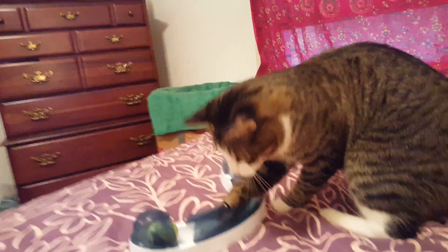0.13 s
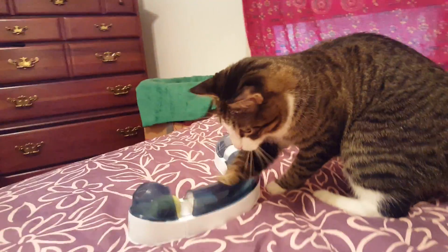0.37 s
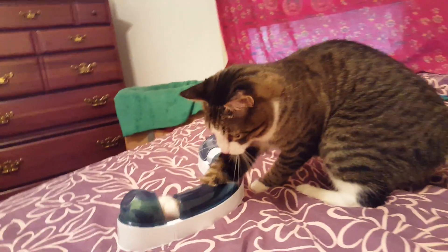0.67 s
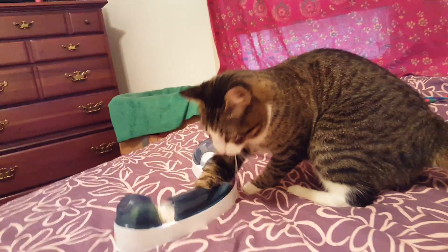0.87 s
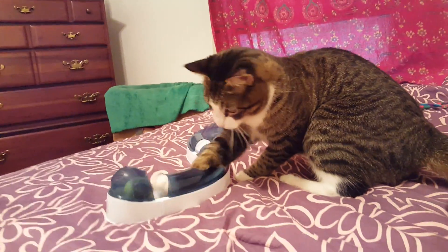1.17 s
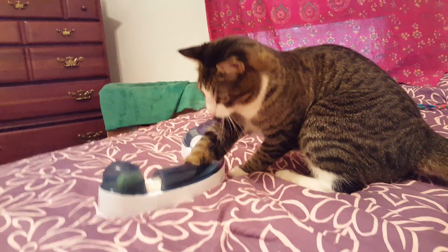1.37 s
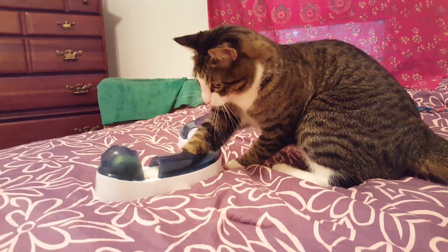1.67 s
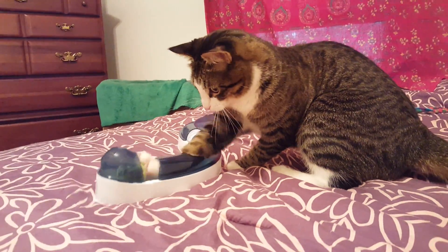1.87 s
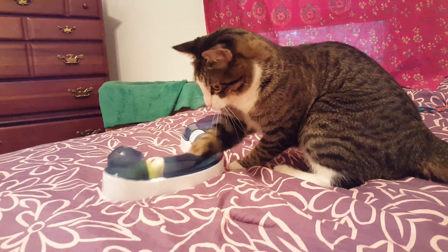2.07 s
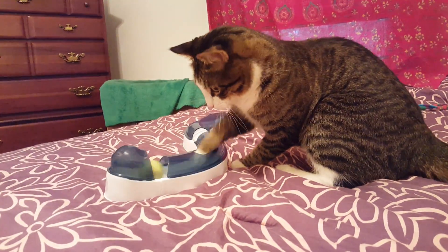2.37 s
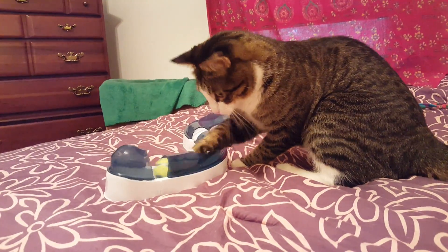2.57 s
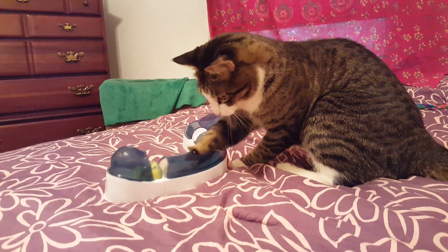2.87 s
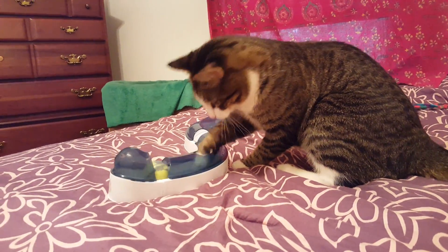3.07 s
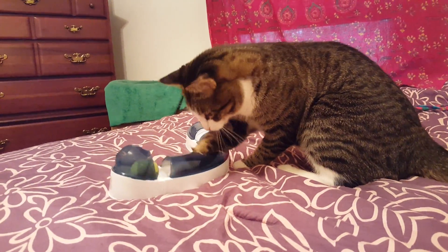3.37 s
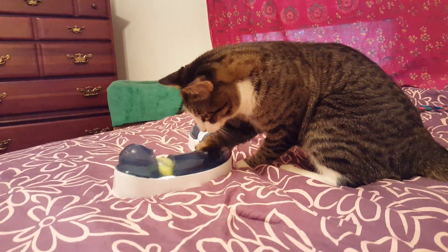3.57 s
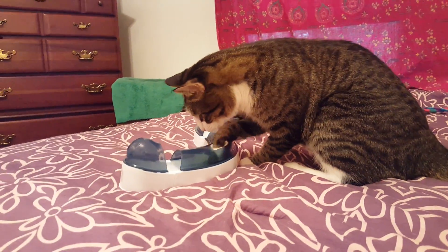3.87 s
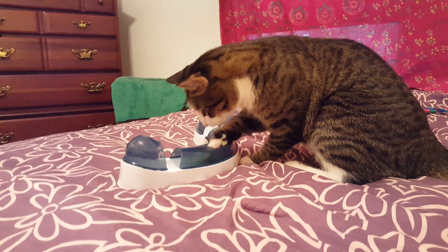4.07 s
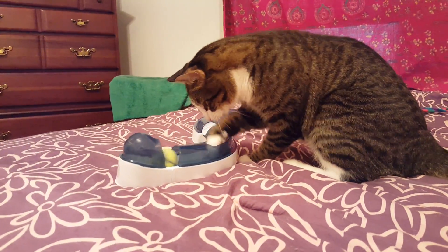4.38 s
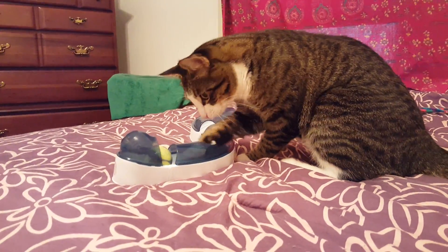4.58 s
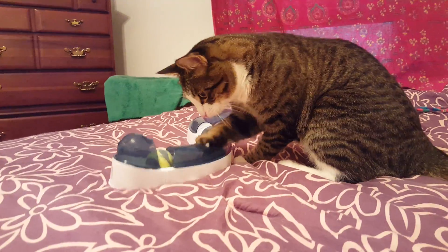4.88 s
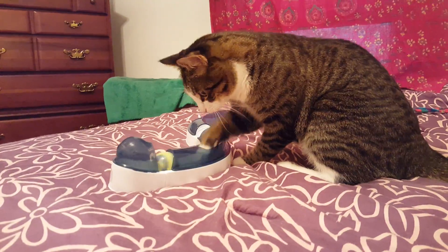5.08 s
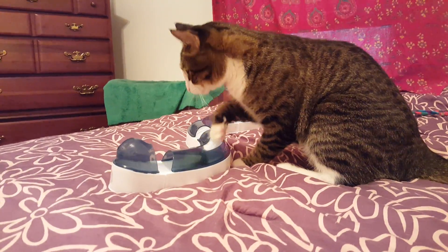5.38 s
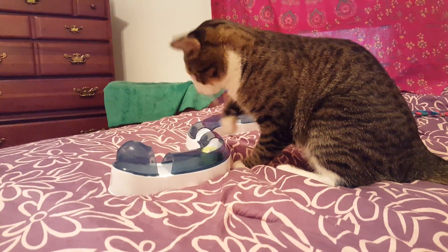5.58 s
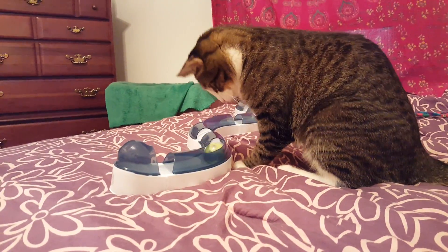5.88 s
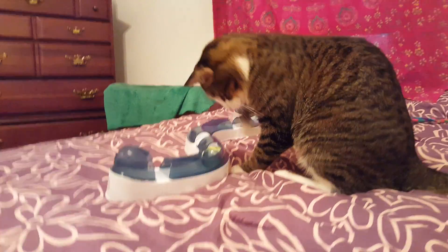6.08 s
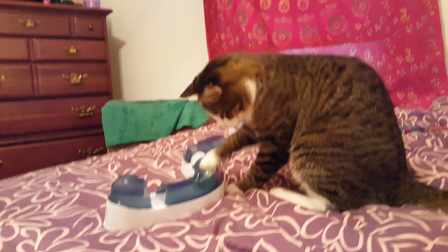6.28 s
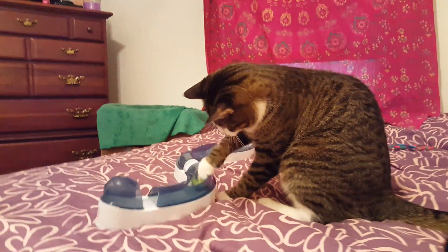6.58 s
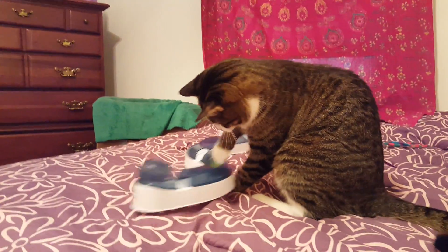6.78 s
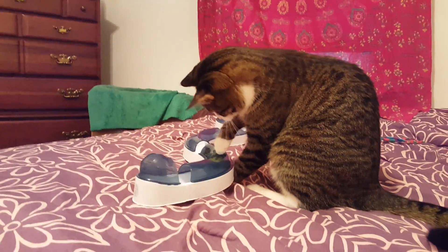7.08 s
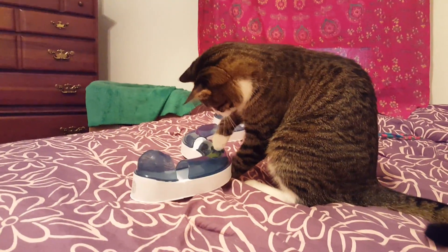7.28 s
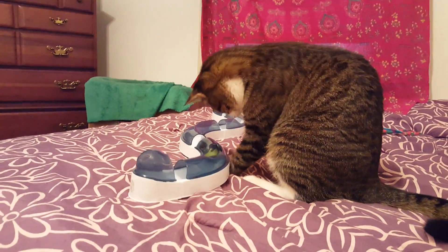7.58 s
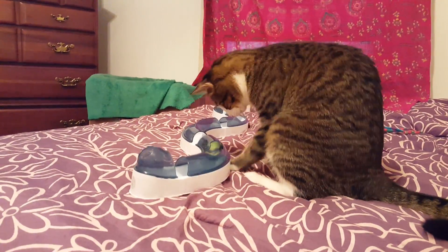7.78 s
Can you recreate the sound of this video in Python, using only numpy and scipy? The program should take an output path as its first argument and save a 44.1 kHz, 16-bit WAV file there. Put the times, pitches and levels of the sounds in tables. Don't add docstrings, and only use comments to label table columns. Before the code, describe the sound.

A cat paws a light ball in a hollow plastic track on a bed. A dense flurry of clicks, rattles and knocks opens, then thins into scattered taps. A loud hollow hit comes near 2.6 seconds, a hard microphone pop at 3, and another cluster just after. Later contacts are softer and sparser. Close stereo phone microphones, small soft room, low air rumble and hiss.

```python
import sys
import numpy as np
from scipy import signal
from scipy.fft import rfft, irfft, next_fast_len
from scipy.io import wavfile
from scipy.ndimage import uniform_filter1d, map_coordinates

SR = 44100
rng = np.random.default_rng(int(sys.argv[2]) if len(sys.argv) > 2 else 0)


def transcribe(u):
    v = np.clip(np.atleast_2d(u).T, -1, 1)
    q = np.round(v * 32767).astype(np.int16)
    wavfile.write(sys.argv[1], SR, q)


def voltage_ratio(level):
    return 10 ** (np.asarray(level, float) / 20)


N = 350154
TOP_HZ = 15900


def unit(x):
    return x / np.sqrt(np.mean(x ** 2) + 1e-20)


def along(points, hz):
    f, v = np.transpose(points)
    return np.interp(np.log(hz + 1), np.log(f + 1), v)


def wobble(rate):
    knots = rng.standard_normal(int(N * rate / SR) + 4)
    return map_coordinates(knots, [np.arange(N) * rate / SR])


def filtered(x, response):
    m = next_fast_len(x.shape[-1] + 2048)
    spectrum = rfft(x, m) * response(np.fft.rfftfreq(m, 1 / SR))
    return irfft(spectrum, m)[..., :x.shape[-1]]


def modes(table):
    def response(f):
        total = 0
        for k, (center, width, db) in enumerate(table):
            damping = 1j * f * width
            total = total + (-1) ** k * voltage_ratio(db) * damping / (center * center - f * f + damping)
        return total
    return response


def rush(response, alike, patchy_db):
    z = signal.stft(rng.standard_normal((2, N)), nperseg=512)[2]
    patches = uniform_filter1d(rng.standard_normal(z.shape[1:]), 6, 0)
    patches = unit(uniform_filter1d(patches, 10, 1))
    pair = signal.istft(z * voltage_ratio(patchy_db * patches), nperseg=512)[1][:, :N]

    def mid_side(hz):
        turn = np.arccos(np.clip(along(alike, hz), -1, 1)) / 2
        return response(hz) * (hz < TOP_HZ) * [np.cos(turn), np.sin(turn)]
    mid, side = filtered(pair, mid_side)
    return unit(np.array([mid + side, mid - side]))


def ports(x, pan_db, lead_s):
    half = np.array([[.5], [-.5]])
    return filtered(np.array([x, x]), lambda f: voltage_ratio(pan_db * half) * np.exp(2j * np.pi * f * lead_s * (half - .5)))


# (frequency [Hz], level [dB])
PORT_COLOUR = [(300, 8), (900, 1.5), (8400, 3), (9300, -7.5), (11000, -12.5), (14000, -8), (16500, -24.5)]


def port_colour(f):
    return voltage_ratio(along(PORT_COLOUR, f))


# (frequency [Hz], t60 [s])
ROOM_DECAY = [(300, 0.332), (2000, 0.1494), (5000, 0.192), (10000, 0.114)]


def tail(length):
    hz, t, z = signal.stft(rng.standard_normal((2, length)), SR, nperseg=256)
    build = 1 - 0.556 * np.exp(-(t / 0.0267) ** 2)
    decay = voltage_ratio(-60 * t / along(ROOM_DECAY, hz)[:, None])
    answer = signal.istft(z * build * decay, SR, nperseg=256)[1][:, :length]
    return answer / np.linalg.norm(answer[0])


# (frequency [Hz], width [Hz], level [dB])
SHELL_MODES = [(413, 780, -18), (1100, 1030, -12), (1760, 783, -6), (2100, 107, -10), (2970, 1000, -27.5)]
# (frequency [Hz], width [Hz], level [dB])
CLAW_MODES = [(3660, 3250, -8), (5700, 4270, -7.5), (7717, 710, -5), (14070, 2250, -12)]
# (time [s], left port's lead [s])
LEFT_LEAD = [(0, 1.4e-4), (2, 1.6e-4), (4, 1.1e-4), (8, .6e-4)]


def struck(s, contact, db, tone, bright_db, beam, room_db):
    def varied(table):
        return [(hz, width, level + 2 * rng.standard_normal()) for hz, width, level in table]

    def soft(table):
        return lambda f: modes(table)(f) / (1 + 1j * f / 4000) ** 2
    body, edge = varied(SHELL_MODES), varied(CLAW_MODES)
    dull = filtered(contact, soft(body + [tone]))
    sharp = filtered(contact, modes(edge + [beam]))
    top = np.abs(dull).max()
    bright = voltage_ratio(bright_db) / np.abs(sharp).max()
    dull = dull / top
    near = ports(dull + bright * sharp, pan_db=-4.0, lead_s=np.interp(s, *np.transpose(LEFT_LEAD)))
    broad = filtered(contact, soft(body)) / top
    spread = .85 * dull + 1.3 * broad + .25 * bright * sharp
    spread = spread + bright * voltage_ratio(-4.0) * filtered(contact, modes(edge))
    size = len(contact)
    delayed = np.pad(spread[:size // 2], (180, 0))[None]
    far = signal.fftconvolve(delayed, tail(size), axes=1)[:, :size]
    return voltage_ratio(db) * (near + voltage_ratio(room_db) * far)


def lay(track, s, sound):
    track[:, round(s * SR):][:, :sound.shape[1]] += sound


def blow(s, db, hz, bright_db, beam, width_hz=420, tone_db=2.5):
    t = np.arange(SR // 5) / SR
    contact = (t == 0) + .12 * voltage_ratio(-60 * t / .003) * rng.standard_normal(len(t))
    room_db = -7.5 - 6.5 * np.log2(hz / 1600) + 0.277 * (bright_db + 22)
    return struck(s, contact, db - 4, (hz, width_hz, tone_db), bright_db + 8.5, beam, room_db)


# (peak time [s], time to fade 10 dB either side [s], roll level [dB], fur level [dB])
CAT_STIRS = [(0.0, 0.1865, -53, -62.5), (0.5, 0.8258, -75.5, -71), (1.66, 0.35, -75, -79),
             (1.9, 0.36, -67, -86.5), (2.03, 0.1137, -78.5, -71), (2.2, 0.41, -70, -80.5),
             (2.61, 0.1027, -73.5, -69.5), (2.87, 0.2, -70, -86), (3.25, 0.01, -70.5, -79),
             (3.73, 0.12, -70.5, -94), (4.27, 0.0765, -79, -76.5), (4.9, 1, -74, -82.5),
             (5.64, 0.31, -72.5, -85.5), (6.16, .08, -80, -74), (6.55, 0.316, -71, -85),
             (6.72, 0.17, -66.5, -66), (7.79, .12, -78, -72)]


def stirring():
    t = np.arange(N) / SR
    power = voltage_ratio([[-79], [-85]]) ** 2
    for s, fade, roll_db, fur_db in CAT_STIRS:
        power = power + voltage_ratio([[2 * roll_db], [2 * fur_db]]) * voltage_ratio(-20 * np.abs(t - s) / fade)
    return np.sqrt(power)


def ball_roll(rolling):
    bumps = rng.standard_normal(N) * voltage_ratio(np.minimum(5 * wobble(300) + 3 * wobble(40), 13))

    def shell(f):
        return modes(SHELL_MODES[1:])(f) * port_colour(f) * (f < TOP_HZ)
    near = ports(unit(filtered(bumps, shell)), pan_db=-0.5, lead_s=0.0001435)
    roll = unit(near + .8 * rush(shell, [(100, .01)], patchy_db=2.5))
    return voltage_ratio(4.5) * rolling * roll


# (frequency [Hz], density [dB per Hz])
FUR_COLOUR = [(1470, -32), (2500, -1), (2910, -15), (3380, -4.5), (5080, -8), (6650, -9), (7880, -0.5),
              (9920, -23.5), (12000, -26), (15600, -50), (22000, -120)]


def fur_rub(brushing):
    hairs = rush(lambda f: voltage_ratio(along(FUR_COLOUR, f)), [(100, .1)], patchy_db=1.2)
    return voltage_ratio(3.0) * brushing * unit(voltage_ratio(1.5 * wobble(30)) * hairs)


# (time [s], gain [dB])
AUTO_GAIN = [(0.0, 2.5), (0.26, 0.27), (1.13, -0.29), (2.9, 0.14), (3.54, -3.5), (3.94, -3.5),
             (4.88, -0.97), (7.94, -0.37)]


def gain_control():
    return np.interp(np.arange(N) / SR, *np.transpose(AUTO_GAIN))


# (frequency [Hz], density [dB per Hz])
RUMBLE_COLOUR = [(12, -31), (20, -8.5), (65, -15), (108, -2), (210, -7), (299, -10), (334, -12),
                 (426, -10.5), (608, -13.5), (694, -15), (1410, -27.5), (2010, -31), (4000, -45),
                 (5200, -77), (8800, -120)]
# (frequency [Hz], width [Hz], level [dB])
DUCT_MODES = [(102.4, 27.5, -6), (241.56, 16.1, -3.5), (428.22, 10.5, -3)]
# (frequency [Hz], left-right likeness [-])
PORT_LIKENESS = [(60, 0.924), (150, 0.965), (380, 0.86), (950, 0.246), (2380, -0.35), (5980, -1.53),
                 (15000, -0.95)]


def ventilation(gain_db):
    broad = rush(lambda f: voltage_ratio(along(RUMBLE_COLOUR, f)), PORT_LIKENESS, patchy_db=.8)
    humming = rush(modes(DUCT_MODES), PORT_LIKENESS, patchy_db=.8)
    level = voltage_ratio(-53.5 + gain_db + 0.24 * wobble(2.948))
    return level * (broad + voltage_ratio(-5.5) * humming) * voltage_ratio([[.4], [-.4]])


# (frequency [Hz], density [dB per Hz])
HISS_COLOUR = [(1470, -4.5), (2500, 0), (2700, -1), (3150, -5.5), (3700, -7.5), (5480, -13), (6900, -13),
               (7560, -16.5), (8890, -21), (15100, -10.5), (15700, -14)]


def microphone_hiss(gain_db, brushing):
    hiss = rush(lambda f: voltage_ratio(along(HISS_COLOUR, f)), [(100, .01)], patchy_db=.3)
    return (voltage_ratio(-72.5 + 0.92 * gain_db) + voltage_ratio(-1) * brushing) * hiss


LID_TONE = (4250, 900, -3)  # (Hz, width Hz, dB)
# (time [s], peak level [dB], shell tone [Hz], bright part [dB])
CLAW_TAPS = [(0.0255, -30, 1790, -12.5), (0.067, -28, 1950, -11), (0.2906, -41.5, 1820, -13),
             (1.5685, -40, 1614, -14), (1.6724, -36, 1720, -8), (2.0144, -38.5, 1273, -8),
             (2.034, -26, 2545, -12.5), (2.137, -37, 1830, -19), (3.2923, -40, 1100, -20),
             (3.438, -30.5, 2574, -8), (3.4427, -39, 2900, -3), (4.2292, -37.5, 1865, -15),
             (4.2734, -45, 1790, -20.5), (4.3274, -41, 1515, -9), (4.3373, -27, 2000, -7.5),
             (4.7699, -33.5, 1150, -19), (4.7718, -36, 2000, -22), (6.5782, -38.5, 1503, -14),
             (7.032, -44.5, 1940, -15), (7.0453, -37, 1780, -5)]


def claw_taps(track):
    for s, db, hz, bright_db in CLAW_TAPS:
        lay(track, s, blow(s, db, hz, bright_db, LID_TONE))


# (time [s], length [s], level [dB], shell tone [Hz], bright part [dB])
BALL_RATTLES = [(0.026, 0.018, -41, 1750, -23), (0.049, 0.0289, -37.5, 1684, -28),
                (0.337, 0.0446, -56, 1250, -27), (0.372, 0.05, -43, 1770, -18.5),
                (0.913, 0.0537, -55, 2334, -12), (1.11, 0.0433, -55, 2165, -12),
                (1.378, 0.051, -55, 1917, -8.5), (1.661, 0.1074, -51, 2003, -11.5),
                (1.848, 0.054, -60.5, 1760, -9.5), (1.988, 0.0794, -49.5, 2350, -14),
                (2.596, .075, -50, 1800, -22), (3.308, 0.0168, -48.5, 1753, -26.5),
                (3.648, .06, -59, 1700, -20), (4.239, 0.054, -65, 2230, -11.5),
                (4.343, .055, -58, 1650, -18), (4.628, 0.088, -67.5, 2130, -4.5),
                (4.815, 0.06, -60, 1910, -33.5), (5.02, .05, -58, 1900, -25),
                (6.577, 0.0367, -58, 1577, -9)]


def ball_rattles(track):
    t = np.arange(SR // 5) / SR
    for s, length, db, hz, bright_db in BALL_RATTLES:
        swell = np.abs(np.sin(np.pi * np.clip(t / length, 0, 1)))
        blows = (rng.random(len(t)) < 1000 / SR) * rng.standard_normal(len(t))
        blows = blows + 0.03 * rng.standard_normal(len(t))
        sound = struck(s, swell * blows, db + 10.5, (hz, 340, 3), bright_db + 6.0, LID_TONE, room_db=-7.5)
        lay(track, s, sound)


# (time [s], peak level [dB], shell tone [Hz], bright part [dB], ping [Hz])
CLAW_SLIPS = [(0.0565, -38, 1990, -10, 7600), (0.1175, -24, 1990, -20, 7700), (0.245, -40, 1946, -12, 8200),
              (0.3923, -29, 1760, -22, 7760), (0.5211, -35, 1590, -5, 4970), (1.6898, -47, 1790, -1, 5000),
              (1.706, -36, 1890, -18, 7440), (1.9044, -46.5, 1990, -4, 7600), (3.0517, -46, 1700, -8, 8100),
              (3.3297, -22.5, 1850, -9, 4200), (3.6415, -31.5, 1690, -4, 4050),
              (4.8054, -39, 1760, -18.5, 7850), (5.002, -39, 1800, 1, 5100), (6.604, -52, 1500, 4, 4000),
              (6.7286, -50, 1500, -5, 8000)]


def claw_slips(track):
    for s, db, hz, bright_db, ping_hz in CLAW_SLIPS:
        lay(track, s, blow(s, db, hz, bright_db, (ping_hz, 450, 6)))


WALL_TONE = (3900, 800, -3)  # (Hz, width Hz, dB)
# (time [s], peak level [dB], shell tone [Hz], bright part [dB])
BALL_KNOCKS = [(0.0907, -42, 1780, -25), (0.1092, -19, 1840, -32.5), (0.3776, -27.5, 1130, -22.5),
               (0.5746, -39, 1150, -20.5), (0.5994, -39, 1925, -27.5), (0.6719, -36, 1250, -26.5),
               (0.727, -27, 1865, -26.5), (0.819, -27.5, 1940, -33.5), (1.025, -41.5, 1543, -33.5),
               (2.198, -39.5, 1734, -31), (2.4829, -38, 1800, -32), (2.569, -39, 1164, -28.5),
               (2.6084, -35, 1910, -22.5), (2.6393, -25, 1715, -33), (2.9105, -37, 1386, -28),
               (3.2407, -38.5, 1575, -26.5), (3.3118, -30, 1670, -20.5), (3.5643, -37.5, 1700, -27.5),
               (4.1156, -35.5, 1760, -30.5), (4.1505, -37.5, 1320, -33.5), (5.473, -43.5, 1346, -25.5),
               (5.5296, -46, 1270, -24.5), (6.5051, -36, 1425, -23.5), (6.544, -40.5, 1626, -25),
               (6.935, -37, 1455, -18)]


def ball_knocks(track):
    for s, db, hz, bright_db in BALL_KNOCKS:
        lay(track, s, blow(s, db, hz, bright_db, WALL_TONE))


# (time [s], peak level [dB], shell tone [Hz], bright part [dB])
TUBE_RINGS = [
    (0.582, -35.5, 1920, -31),
    (1.879, -30, 1850, -29),
    (2.5896, -21, 1760, -4.5),
    (3.3355, -21, 1850, -30),
    (4.8115, -29, 1860, -37),
    (6.3307, -32.5, 1530, -17.5),
    (7.389, -30.5, 1560, -15),
]


def tube_rings(track):
    for s, db, hz, bright_db in TUBE_RINGS:
        lay(track, s, blow(s, db, hz, bright_db, WALL_TONE, width_hz=150, tone_db=8))


# (time [s], size [full scale], rise [Hz])
PORT_STEPS = [
    (3.0181, .03, 900),
    (3.01914, 1.06, 7000),
    (3.0222, .04, 500),
    (3.0232, -.06, 500),
]


def port_pop():
    cut_hz, ring_hz, damping = 78, 82, 1.15

    def response(f):
        steps = sum(size * np.exp(-2j * np.pi * f * s) / (1 + 1j * f / hz) ** 2 for s, size, hz in PORT_STEPS)
        hollow = 1 - .7 * modes([(10000, 5000, 0)])(f)
        ring = ring_hz ** 2 - f * f + 1j * f * ring_hz * damping
        low_cut = -f * f / (2 * np.pi / SR) / ((1j * f + cut_hz) * ring)
        return steps * hollow * low_cut
    return filtered(np.arange(N) == 0, response) * np.array([[1], [0]])


def scene():
    rolling, brushing = stirring()
    gain_db = gain_control()
    steady = ball_roll(rolling) + fur_rub(brushing)
    steady = steady + ventilation(gain_db) + microphone_hiss(gain_db, brushing)
    track = np.zeros((2, N + SR))
    for contacts in (claw_taps, ball_rattles, claw_slips, ball_knocks, tube_rings):
        contacts(track)
    return steady + filtered(track[:, :N], port_colour) + port_pop()


def low_pass(x):
    return signal.sosfilt(signal.butter(12, 16980, fs=SR, output="sos"), x)


def record(dry):
    mix = dry - .0005
    return low_pass(mix)


dry = scene()
out = record(dry)
transcribe(out)
```